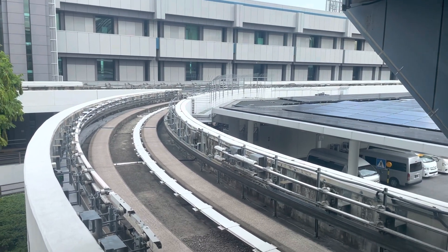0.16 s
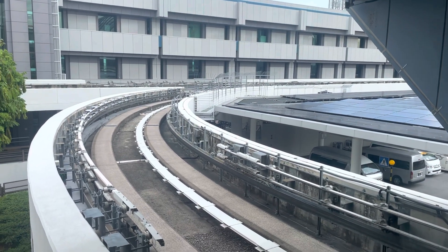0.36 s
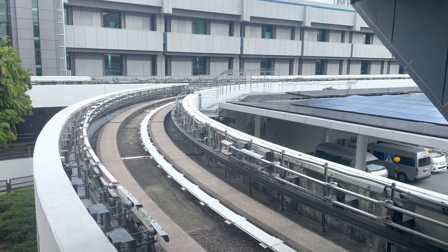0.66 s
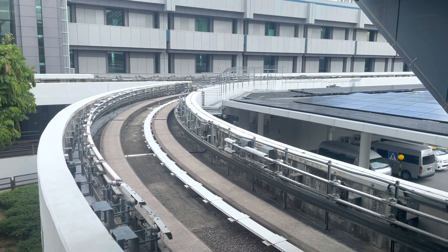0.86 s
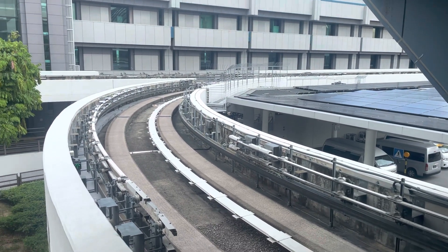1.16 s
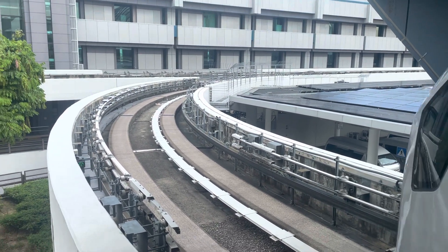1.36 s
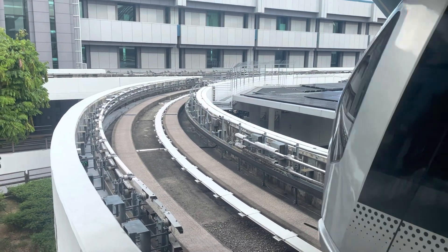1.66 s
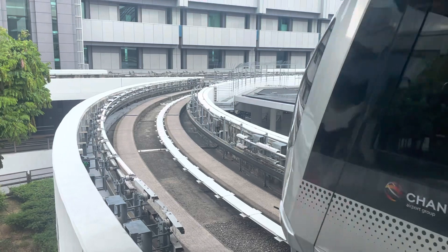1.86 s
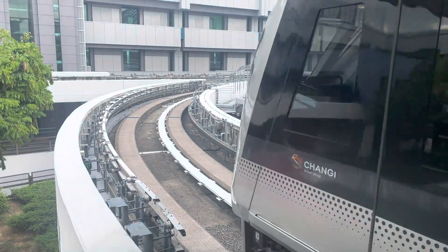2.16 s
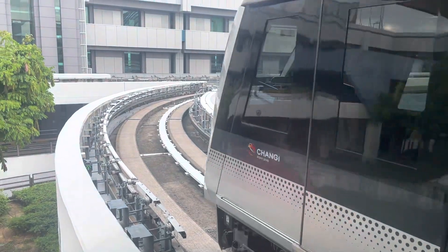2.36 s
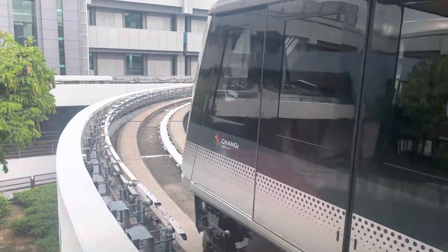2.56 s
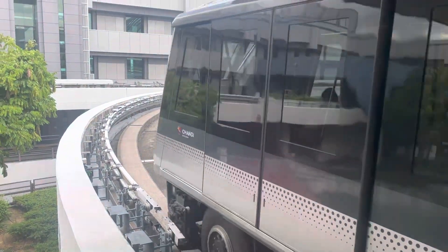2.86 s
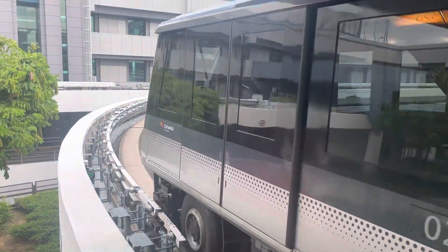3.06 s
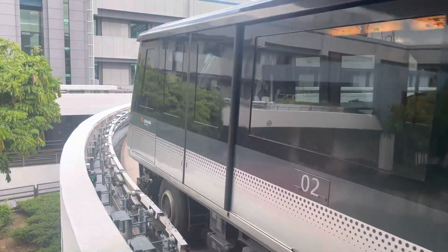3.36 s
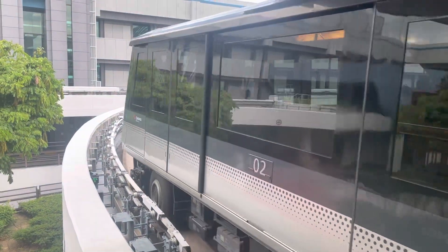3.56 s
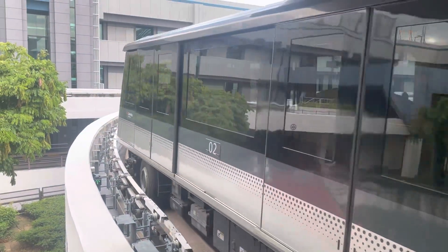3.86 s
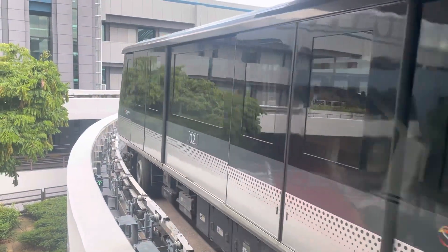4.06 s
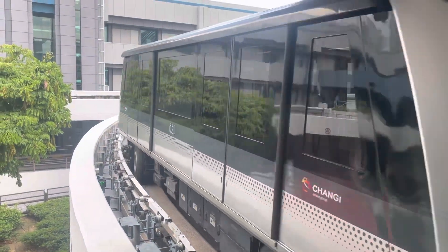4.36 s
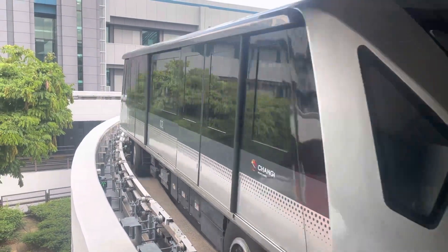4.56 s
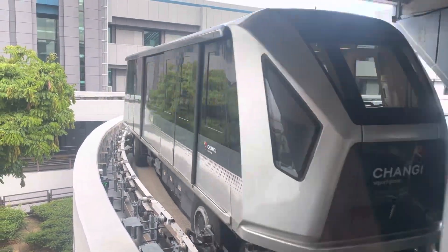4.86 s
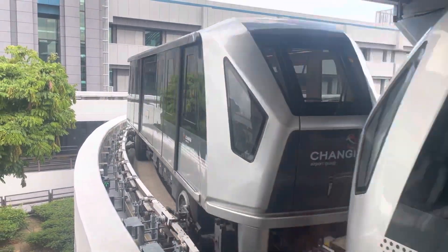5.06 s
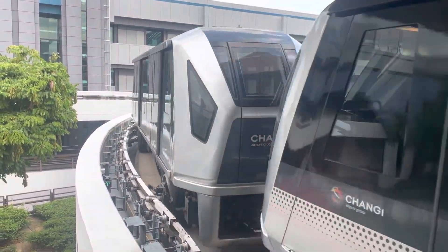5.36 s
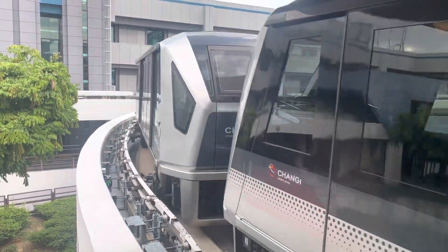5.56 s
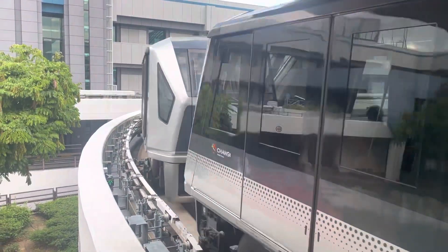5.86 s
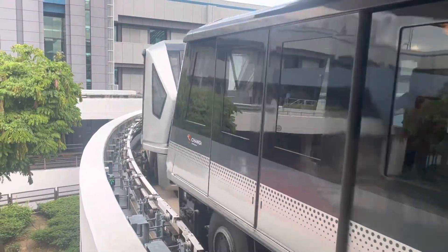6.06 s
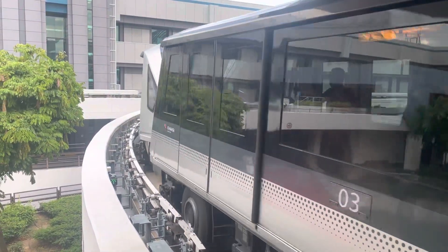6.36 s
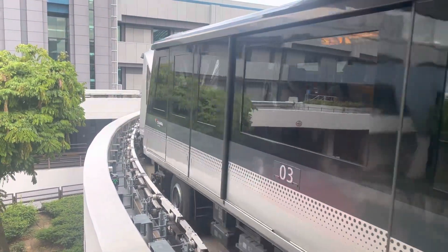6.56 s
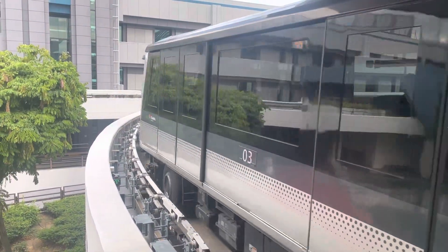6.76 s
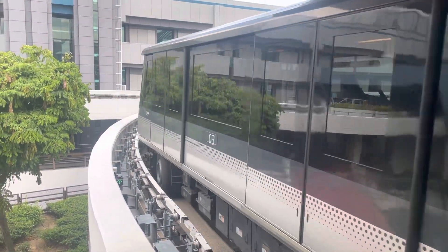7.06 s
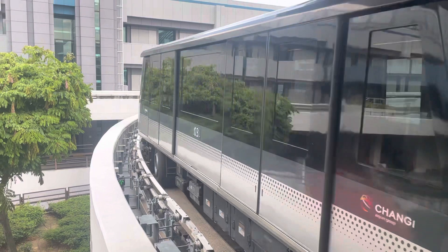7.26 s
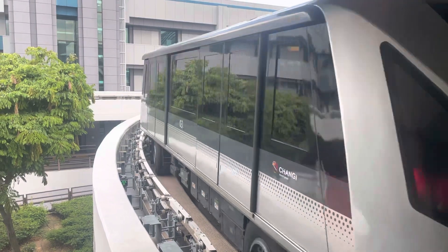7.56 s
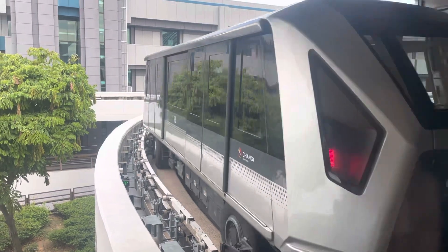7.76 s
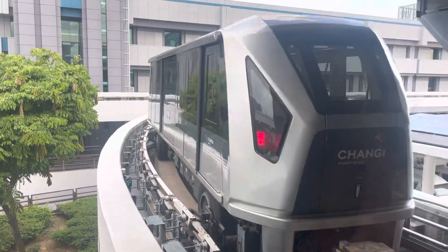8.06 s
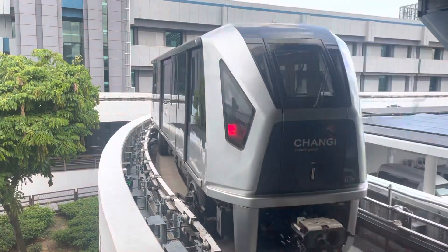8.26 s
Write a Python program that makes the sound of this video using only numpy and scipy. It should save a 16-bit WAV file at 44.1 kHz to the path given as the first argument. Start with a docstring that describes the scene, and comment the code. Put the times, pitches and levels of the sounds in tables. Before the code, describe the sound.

Close beside an elevated concrete curve outdoors, a two-car rubber-tyred train passes. A wavering electric hum and low rumble come first, then a soft thump and deep boom as the first car arrives. Collector shoes rub and ring with fine hiss, a few gritty spits sound under the second car, and the rumble gradually weakens. Stereo microphones at the track, with a diffuse yard wash behind.

```python
"""Beside an elevated concrete curve outside a station, microphone pair at the track, yard below.
A rubber-tyred people mover rolls past: tyre noise shakes deck and car bodies, and the deck booms and thumps.
Wavering tones make the drive's hum and whine, the wheels' drones and two faint squeals ahead of the first car;
coloured noise and ringing resonances are the collector shoes on the power rail, with a few gritty spits
as the second car passes and one metallic tick late on. Station walls and yard are diffuse noise behind."""
import sys
import numpy as np
from scipy import signal
from scipy.fft import rfft, irfft
from scipy.io import wavfile
from scipy.ndimage import uniform_filter1d

SR = 44100
rng = np.random.default_rng(int(sys.argv[2]) if len(sys.argv) > 2 else 0)


def transcribe(u):
    """Save the signal u as a 16-bit wav file named by the first command-line argument.

    u: samples, shape (n,) or (channels, n), limited to [-1, 1]; the rate is SR.
    q: integer samples, one column per channel.
    """
    v = np.clip(np.atleast_2d(u).T, -1, 1)
    q = np.round(v * 32767).astype(np.int16)
    wavfile.write(sys.argv[1], SR, q)


N = 370440
TIME = np.arange(N) / SR  # s
FREQS = np.fft.rfftfreq(N, 1 / SR)  # Hz

# Relative noise spectra of deck, car bodies and tyres: f/Hz, level/dB per Hz
DECK_COLOUR = [(12, -39.5), (22, -25.5), (34, -12), (48, 4.5), (68, 2.5), (95, 3), (115, -13), (160, -38.5),
               (400, -75.5)]
BODY_COLOUR = [(25, -32), (70, -15.5), (100, -2.5), (120, 2.5), (152, -4), (168, -3.5), (205, -2),
               (228, -5.5), (255, -9.5), (290, -11), (335, -12.5), (375, -13), (430, -24), (600, -35.5),
               (1500, -97)]
TYRE_COLOUR = [(200, -17), (380, 0), (455, 3.5), (520, -2), (710, 0.5), (790, -1.5), (920, -0.5),
               (1100, -3.5), (1240, -5), (1420, -11), (1750, -8.5), (2500, -19.5), (3500, -30),
               (6000, -85.5)]
# Rolling noise alongside, level/dB and fade/(dB/s) as the train draws away after LEAVES_S
LEAVES_S = 4.54
BODY_DB, BODY_FADE_DB_PER_S = -27.5, 3
TYRE_DB, TYRE_FADE_DB_PER_S = -38, 1.33
DECK_DB, DECK_FADE_DB_PER_S = -37, 2
# Axles going by: t/s, deck rumble level/dB, car body level/dB
AXLES = [(2.5, -33, -33), (4.25, -36, -44), (5.65, -34.5, -31.5), (7.35, -40, -35.5)]
AXLE_SWELL_S = 0.5
# Brief surges and dips of the low rumble: t/s, level/dB, width/s
SURGES = [(0.0, 0, 0.053), (2.17, 2.5, 0.046), (2.33, -2, 0.025), (2.68, 1.5, 0.054), (3.33, -5, 0.026),
          (3.5, 2.5, 0.028), (3.66, -1.5, 0.05), (3.81, 2.5, 0.022), (3.98, 1, 0.027), (4.26, -3, 0.067),
          (4.43, 1.5, 0.052), (6.24, 0, 0.031), (6.42, -4, .05), (6.74, -2, 0.018), (7.27, -1, 0.0093),
          (7.35, 4, 0.013), (7.86, -0.5, 0.044)]

# Deck booms under the wheels: t/s, level/dB
BOOMS = [(2.439, -22.5), (3.17, -25.5), (8.25, -36)]
BOOM_REST_DB = -41  # faint hum that stays
BOOM_RISE_DB_PER_S, BOOM_FADE_DB_PER_S = 57.5, 17.5
BOOM_LOW_HZ, BOOM_ONSET_HZ, BOOM_TOP_HZ, BOOM_CLIMB_HZ_PER_S = 51.15, 59.66, 70.3, 11
# First car runs onto the span
THUMP_S, THUMP_DB, THUMP_WIDTH_S, THUMP_HZ = 1.815, -26.5, 0.045, 97

# Relative noise spectra of shoe rubbing and of the fine hiss above it: f/Hz, level/dB per Hz
RUB_COLOUR = [(1000, -36.5), (1600, -15.5), (1900, -4), (2250, -2), (2550, -5), (2850, 1.5), (3000, 1.5),
              (3200, -1), (3550, -15), (4000, -23), (6000, -60)]
HISS_COLOUR = [(2000, -20), (3500, 0), (4450, -1), (4900, -6), (6000, -9), (7200, -11.5), (8100, -26),
               (9800, -24), (11500, -28), (13500, -38), (16000, -50)]
# Ringing resonances of the shoes: f/Hz, width/Hz, relative level/dB
SHOE_MODES = [(1948, 85, -5), (2052, 65, -3.5), (2107, 60, -5), (2200, 79, -8), (3017, 80, -10),
              (3145, 70, -7)]
SHOE_WANDER, SHOE_FLICKER_DB = .005, 1.4  # rms share of pitch, rms dB
# Shoes of each car at their nearest: t/s, rubbing level/dB, ringing level/dB
CARS = [(2.55, -43.5, -51), (5.2, -48, -47.5)]
RUB_SWELL_S, RING_SWELL_S = 1.58, 1.67
TAIL_S, TAIL_FADE_DB_PER_S = 6.4, 2.5  # rubbing dies away behind the last car
HISS_DB, HISS_REST_DB = -58, -61.5
SURGE_S, SURGE_DB, SURGE_WIDTH_S = 1.75, -59, 0.58  # hiss surges as the first shoes arrive

# Drive hum, upper and lower partial: t/s, level/dB
HUM_LEVEL = [(0.0, -41), (1.08, -41), (1.22, -31), (1.42, -42), (1.56, -31.5), (1.72, -33), (1.86, -48.5),
             (2.04, -44), (2.14, -34.5), (2.3, -47.5), (2.6, -36), (2.76, -41), (2.97, -32), (3.16, -48),
             (3.54, -48), (3.7, -32), (3.86, -37.5), (4.02, -32), (4.28, -46), (4.5, -35), (4.92, -37),
             (5.4, -47), (7.1, -48), (7.5, -39.5), (7.84, -42), (8.15, -52.5), (8.4, -46)]
LOW_HUM_LEVEL = [(0.0, -37), (1.0, -29.5), (1.22, -37.5), (2.38, -29.5), (3.0, -35), (3.5, -30),
                 (4.05, -29), (4.24, -39.5), (5.15, -32.5), (5.42, -40.5), (5.76, -26), (6.2, -35),
                 (6.55, -28.5), (6.92, -47), (7.2, -31.5), (7.6, -39.5), (8.4, -46)]
HUM_HZ, LOW_HUM_HZ = 302.5, 149.8
# Gear whine, coming and going: t/s, level/dB
WHINE_LEVEL = [(0.0, -38.5), (0.4, -53.5), (0.7, -41.5), (0.95, -39), (1.2, -42), (1.6, -43.5), (1.85, -47),
               (2.55, -41), (3.0, -45), (3.7, -43.5), (4.14, -56), (4.63, -45), (5.0, -48.5), (6.0, -47.5),
               (6.55, -53), (6.8, -43.5), (7.34, -54), (7.65, -48), (8.4, -50.5)]
WHINE_HZ, WHINE_SAGS_S, WHINE_SAG_HZ_PER_S = 859, 3.3, 2.2  # sags once the first car is past

# Running-gear drones, on the approach and in the curve: start t/s, length/s, start f/Hz, top f/Hz, level/dB
TREADS = [(0.17, .8, 368, 393, -38.5), (3.85, 2.5, 510, 572, -50), (4.15, 1.1, 432, 480, -51),
          (2.6, 3.0, 700, 712, -52)]
TREAD_SETTLE_S, TREAD_FADE_DB_PER_S = 0.82, 19.5
# Faint squeals in the curve: start t/s, length/s, f/Hz, level/dB of the core
SQUEALS = [(1.06, 0.18, 2480, -48.5), (2.119, 0.16, 1252, -51)]
SQUEAL_RISE_DB_PER_S, SQUEAL_FADE_DB_PER_S = 99.5, 32
# Hissing spits from under the second car: t/s, level/dB, rise/s, decay/s
SPITS = [(5.26, -65, .015, .04), (5.359, -64, .03, 0.068), (5.41, -64, .02, .06), (5.465, -59, 0.022, 0.1),
         (5.533, -51.5, 0.035, 0.095), (5.595, -55, .045, 0.04), (5.75, -64, .03, .04),
         (5.82, -53.5, 0.006, 0.029), (5.91, -62, 0.012, .13), (6.05, -65, .09, .11)]
# Relative spectrum of the spits: f/Hz, level/dB per Hz
SPIT_COLOUR = [(2500, -16), (3900, 2), (5000, -1.5), (7000, -4.5), (8300, -16), (9500, -8), (11500, -10.5),
               (13000, -17.5), (15000, -40)]
SPECKS_PER_S = 1600
# Small metallic tick: f/Hz, level/dB, t60/s
TICK_MODES = [(3550, -54, .09), (7030, -56, .055)]
TICK_S = 7.489

# Relative spectra of the rush off the station walls and of the yard below: f/Hz, level/dB per Hz
STATION_COLOUR = [(300, -14), (480, 3), (680, 6), (950, -8), (1250, -3), (1550, 2), (1850, -1.5),
                  (2050, -3), (2300, -1), (2700, -3), (3200, -14), (4000, -28), (7000, -51)]
YARD_COLOUR = [(30, -1.5), (100, 5), (400, 4.5), (520, 4.5), (700, 2), (950, -7.5), (1600, -8), (2100, -3),
               (3000, -14.5), (4000, -30.5), (8000, -91), (14000, -45)]
# The cars screen the station walls for a while
STATION_DB, SCREEN_DB, SCREEN_FROM_S, SCREEN_TO_S = -46.8, -13, 2.3, 7.6

# Between the microphone ports, lead of the left: f/Hz, phase/rad
LEFT_LEAD = [(50, 0), (150, -.05), (340, -0.13), (550, -1), (850, -0.5), (1400, -1.3), (1850, 0.24),
             (2200, 0.1), (3000, 0.88), (4000, 0), (5100, 0.83), (7000, -1.85), (8500, -4.5), (11000, -0.5)]
# Between the microphone ports, left minus right: f/Hz, level/dB
BALANCE = [(50, -2), (130, 0.5), (220, -1), (420, 2), (720, -0.3), (1100, 2), (1450, 4), (1900, 1.5),
           (3100, 4), (4500, 2.5), (8000, -0.5)]
# Sound the two ports do not share, against what they share: f/Hz, level/dB
UNSHARED = [(25, -25), (55, -20), (100, -12.5), (145, -18), (250, -11.5), (305, -13.5), (400, -8.5),
            (560, -4.1), (900, -5.1), (1300, -2.7), (1650, -.8), (2100, -6.2), (4400, -6.4), (7000, -4.2)]
LOW_CUT_HZ, EDGE_HZ = 28, 14000


def rolling():
    """Tyres on rough concrete shake the deck and the car bodies, and roar themselves."""
    away_s = since(LEAVES_S)
    deck_power = sum(going_by(s, db, AXLE_SWELL_S) for s, db, _ in AXLES)
    body_power = sum(going_by(s, db, AXLE_SWELL_S) for s, _, db in AXLES)
    tyre_power = gain_of(-14.5) ** 2 * body_power
    shaking = np.sqrt(gain_of(DECK_DB - DECK_FADE_DB_PER_S * away_s) ** 2 + deck_power)
    droning = np.sqrt(gain_of(BODY_DB - BODY_FADE_DB_PER_S * away_s) ** 2 + body_power)
    roaring = np.sqrt(gain_of(TYRE_DB - TYRE_FADE_DB_PER_S * away_s) ** 2 + tyre_power)
    deck = shaking * steadied(noise(DECK_COLOUR), span_s=0.1)
    body = droning * steadied(noise(BODY_COLOUR), span_s=0.24)
    tyres = roaring * gain_of(0.4 * drift(4.3)) * noise(TYRE_COLOUR)
    return surging(SURGES) * (deck + body) + tyres


def boom():
    """A low resonance of the deck and its rougher octave, rising as the first car rolls over it."""
    first_s = BOOMS[0][0]
    climbing_hz = BOOM_ONSET_HZ + BOOM_CLIMB_HZ_PER_S * (TIME - first_s)
    hz = np.clip(climbing_hz, BOOM_LOW_HZ, BOOM_TOP_HZ)
    swell_power = sum(gain_of(db + held(s, s, BOOM_RISE_DB_PER_S, BOOM_FADE_DB_PER_S)) ** 2
                      for s, db in BOOMS)
    fundamental = steadied(tone(hz, width_hz=5, rough=0.2), span_s=.25)
    octave = gain_of(-9.0) * tone(2 * hz, width_hz=16, rough=0.8)
    return np.sqrt(swell_power + gain_of(BOOM_REST_DB) ** 2) * (fundamental + octave)


def thump():
    """The span gives one soft, low thump as the first car runs onto it."""
    swell = np.exp(-.5 * ((TIME - THUMP_S) / THUMP_WIDTH_S) ** 2)
    return gain_of(THUMP_DB) * swell * tone(THUMP_HZ, width_hz=27, rough=.5)


def shoes():
    """Collector shoes rub the rail: broad friction noise, a few ringing resonances and fine hiss above."""
    rubbing = np.sqrt(sum(going_by(s, db, RUB_SWELL_S) for s, db, _ in CARS))
    rubbing = rubbing * gain_of(-TAIL_FADE_DB_PER_S * since(TAIL_S))
    rub = rubbing * noise(RUB_COLOUR)

    ringing = np.sqrt(sum(going_by(s, db, RING_SWELL_S) for s, _, db in CARS))
    # they ring once in the curve
    ringing = ringing * gain_of(held(start_s=1.83, end_s=6.4, rise_db_per_s=9, fade_db_per_s=1.2))
    wander = 1 + SHOE_WANDER * drift(2.5)
    modes = 0
    for hz, width_hz, db in SHOE_MODES:
        flickering = gain_of(db + SHOE_FLICKER_DB * drift(14))
        modes = modes + flickering * tone(hz * wander, width_hz, rough=1)
    ring = ringing * modes

    hiss_db = HISS_DB + held(start_s=1.53, end_s=5.9, rise_db_per_s=4.0, fade_db_per_s=5.0)
    hiss_db = np.maximum(hiss_db, HISS_REST_DB)
    hissing = np.sqrt(gain_of(hiss_db) ** 2 + going_by(SURGE_S, SURGE_DB, SURGE_WIDTH_S))
    hiss = hissing * noise(HISS_COLOUR)

    contact_db = 0.58 * drift(22)  # the contact pressure flutters
    return gain_of(contact_db) * (rub + ring + hiss)


def drive():
    """A wavering electric hum of two partials about an octave apart, and a fuzzy gear whine."""
    upper_tone = tone(HUM_HZ + 1.21 * drift(5.5), width_hz=13, rough=0.4)
    lower_tone = tone(LOW_HUM_HZ + 2.5 * drift(3), width_hz=13, rough=0.45)
    upper = gain_of(over_time(HUM_LEVEL)) * steadied(upper_tone, span_s=.2)
    lower = gain_of(over_time(LOW_HUM_LEVEL)) * steadied(lower_tone, span_s=.25)
    whine_hz = WHINE_HZ - WHINE_SAG_HZ_PER_S * since(WHINE_SAGS_S) + 6 * drift(9)
    gears = tone(whine_hz, width_hz=25, rough=0.85)
    whine = gain_of(over_time(WHINE_LEVEL)) * steadied(gears, span_s=0.1)
    return upper + lower + whine


def tread(start_s, length_s, start_hz, top_hz, db):
    """A tread or guide wheel drones roughly, gliding up towards a top pitch about which it wavers."""
    hz = top_hz + (start_hz - top_hz) * np.exp(-since(start_s) / TREAD_SETTLE_S)
    shape_db = held(start_s, start_s + length_s, TREAD_FADE_DB_PER_S, TREAD_FADE_DB_PER_S)
    drone = tone(hz + 4 * drift(5), width_hz=22, rough=0.9)
    return gain_of(db + shape_db) * drone


def squeal(start_s, length_s, pitch_hz, db):
    """A brief, ragged squeal: a wavering core in a fuzzy skirt, with a weak octave."""
    hz = pitch_hz + 9 * drift(9)
    shape_db = held(start_s, start_s + length_s, SQUEAL_RISE_DB_PER_S, SQUEAL_FADE_DB_PER_S)
    grip_db = 1.8 * drift(20)
    core = tone(hz, width_hz=32, rough=.8)
    skirt = gain_of(-2.5) * tone(hz, width_hz=80, rough=1)
    octave = gain_of(-22) * tone(2 * hz, width_hz=90, rough=1)
    return gain_of(db + shape_db + grip_db) * (core + skirt + octave)


def spits():
    """Short, bright scrapes that catch quickly and die away: hiss with gritty specks in it."""
    power = 0
    for s, db, rise_s, decay_s in SPITS:
        steps = np.maximum((s - TIME) / rise_s, (TIME - s) / decay_s)
        power = power + gain_of(db) ** 2 * np.exp(-2 * steps)
    specks = rng.standard_normal((2, N)) * (rng.random(N) < SPECKS_PER_S / SR)
    gritty = at_ports(*specks, gain_of(over_band(SPIT_COLOUR)))
    grain_db = 1.1 * drift(150)
    # hiss and specks share the power equally
    return np.sqrt(power / 2) * gain_of(grain_db) * (noise(SPIT_COLOUR) + gritty)


def tick():
    """A small metal fitting is knocked once, and its modes ring down."""
    age_s = since(TICK_S)
    ring = sum(gain_of(db - 60 * age_s / t60) * tone(hz, width_hz=120, rough=.5)
               for hz, db, t60 in TICK_MODES)
    return ring * (1 - np.exp(-age_s / 0.0017))


def station():
    """A flat, diffuse rush from the station walls, fading as the cars come between, then returning."""
    open_db = -held(SCREEN_FROM_S, SCREEN_TO_S, rise_db_per_s=10.0, fade_db_per_s=20.0)
    screened_db = np.minimum(SCREEN_DB + open_db, 0)
    return gain_of(STATION_DB + screened_db) * noise(STATION_COLOUR)


def yard():
    """The steady wash of the yard below, as diffuse noise."""
    return gain_of(-47.0) * noise(YARD_COLOUR)


def noise(colour):
    """Stereo noise of rms 1 in the middle, with the given spectrum in dB."""
    return at_ports(*rng.standard_normal((2, N)), gain_of(over_band(colour)))


def tone(hz, width_hz, rough):
    """A machine line: a clean core plus reflections that smear it as the train moves."""
    turn = np.exp(2j * np.pi * np.cumsum(hz * np.ones(N)) / SR)
    share = np.clip(rough, 0, 1)  # of the power, smeared
    near, far = [(drift(width_hz) + 1j * drift(width_hz)) / np.sqrt(2) for _ in range(2)]
    core = np.sqrt(1 - share) * np.exp(2j * np.pi * rng.random())
    direct = (turn * (core + np.sqrt(share) * near)).real
    scattered = (turn * far).real
    return at_ports(direct, scattered)


def at_ports(direct, scattered, colour=1):
    """Two unrelated signals become a partly alike left and right, with a middle of rms 1."""
    shared = rfft(direct)
    apart = rfft(scattered) * gain_of(over_band(UNSHARED))
    lean = gain_of(over_band(BALANCE) / 2) * np.exp(.5j * over_band(LEFT_LEAD))
    left, right = (shared + apart) * lean, (shared - apart) / lean
    pair = irfft(np.array([left, right]) * colour, N)
    return pair / np.std(pair.mean(0))


def steadied(pair, span_s):
    """Holds the loudness of a sound even over the span; its faster throbbing stays."""
    power = uniform_filter1d(pair.mean(0) ** 2, max(int(span_s * SR), 1))
    return pair / np.sqrt(abs(power) + 1e-6)


def drift(per_s):
    """Slow chance of rms about 1, up to about the given rate."""
    coarse_s = TIME[::20]
    rates = np.fft.rfftfreq(len(coarse_s), coarse_s[1])
    smoothing = np.exp(-(rates / per_s) ** 2)
    slow = irfft(rfft(rng.standard_normal(len(coarse_s))) * smoothing, len(coarse_s))
    return np.interp(TIME, coarse_s, evened(slow))


def going_by(s, db, width_s):
    """Power of a point that passes the microphones: inverse square of its distance."""
    return gain_of(db) ** 2 / (1 + ((TIME - s) / width_s) ** 2)


def surging(rows):
    """Gain that swells or dips briefly at each row."""
    return gain_of(sum(db * np.exp(-.5 * ((TIME - s) / width_s) ** 2) for s, db, width_s in rows))


def held(start_s, end_s, rise_db_per_s, fade_db_per_s):
    """An envelope in dB: rises to 0 at the start, holds, and fades after the end."""
    return -rise_db_per_s * np.maximum(start_s - TIME, 0) - fade_db_per_s * since(end_s)


def since(s):
    """Seconds gone by since a moment, zero before it."""
    return np.maximum(TIME - s, 0)


def over_time(rows):
    """A table of levels over time, joined at every sample."""
    s, db = np.transpose(rows)
    return np.interp(TIME, s, db)


def over_band(points):
    """A table over frequency, joined on a log axis."""
    f, value = np.transpose(points)
    return np.interp(np.log(FREQS + 1), np.log(f + 1), value)


def gain_of(db):
    """Decibels to amplitude."""
    return 10 ** (np.asarray(db) / 20)


def evened(x):
    """Scales to rms 1."""
    return x / np.sqrt(np.mean(x ** 2) + 1e-20)


def scene():
    """The train at the track, over the station walls and the steady wash of the yard below."""
    drones = sum(tread(*row) for row in TREADS)
    running = rolling() + boom() + thump() + shoes() + drive() + drones
    small_sounds = sum(squeal(*row) for row in SQUEALS) + spits() + tick()
    return running + small_sounds + station() + yard()


def record(dry):
    """The recorder cuts the deepest bass, opens and closes softly, and limits the band."""
    low_cut = signal.butter(4, LOW_CUT_HZ, "highpass", fs=SR, output="sos")
    thinned = signal.sosfilt(low_cut, dry)
    soft_ends = np.minimum(np.minimum(TIME, TIME[::-1]) / .004, 1)
    band_limit = signal.firwin(511, EDGE_HZ, window=("kaiser", 9), fs=SR)
    return signal.oaconvolve(thinned * soft_ends, band_limit[None], "same")


dry = scene()
out = record(dry)
transcribe(out)
```